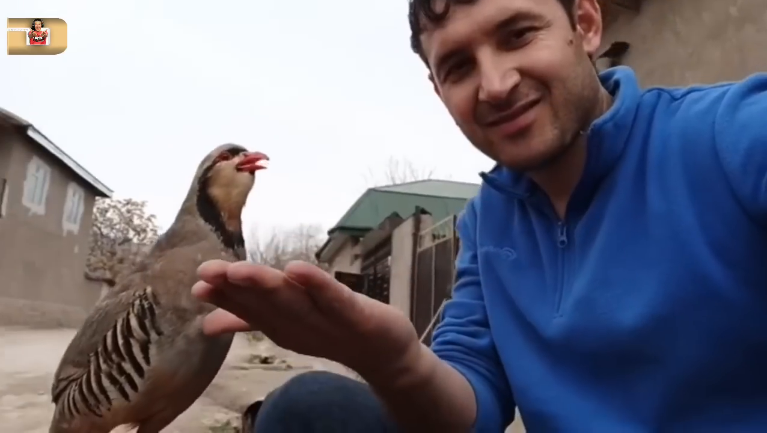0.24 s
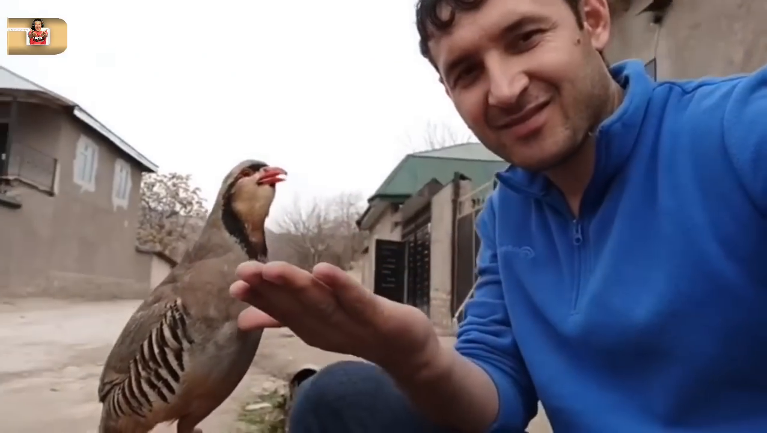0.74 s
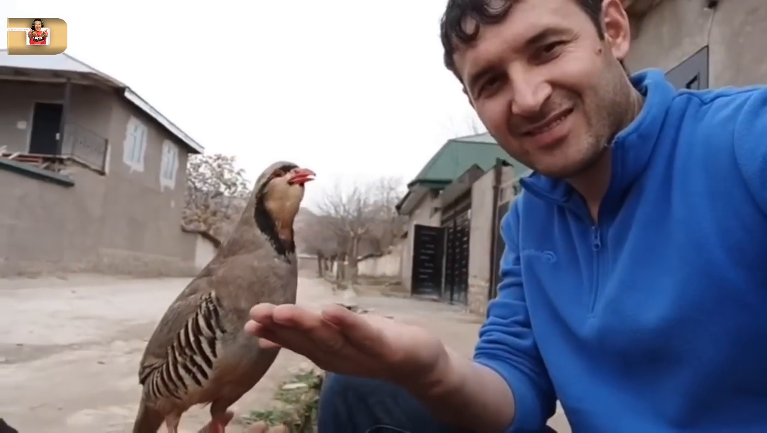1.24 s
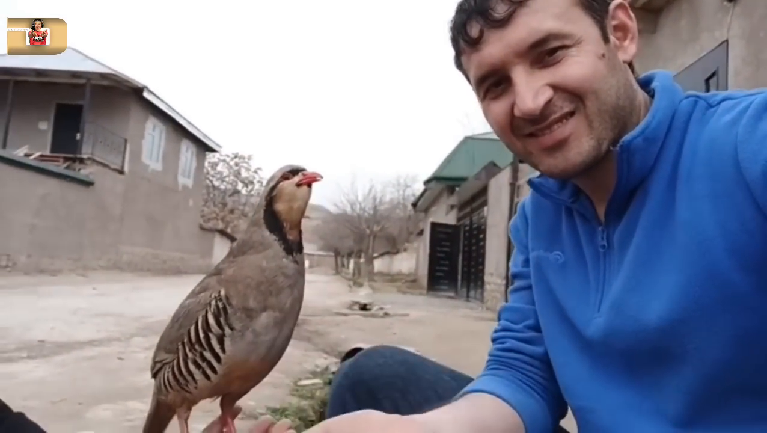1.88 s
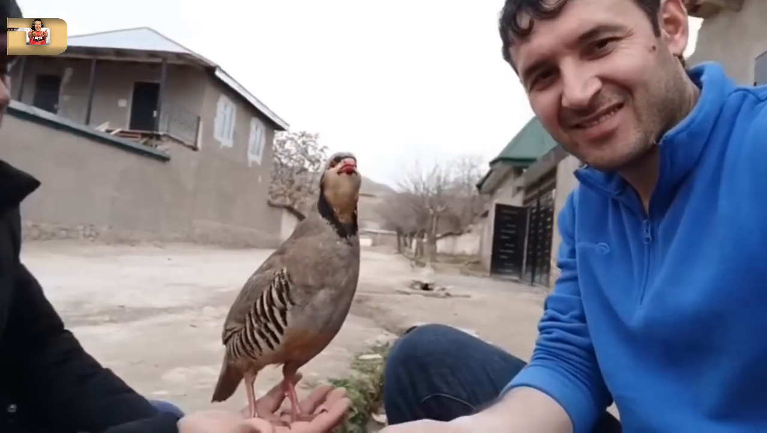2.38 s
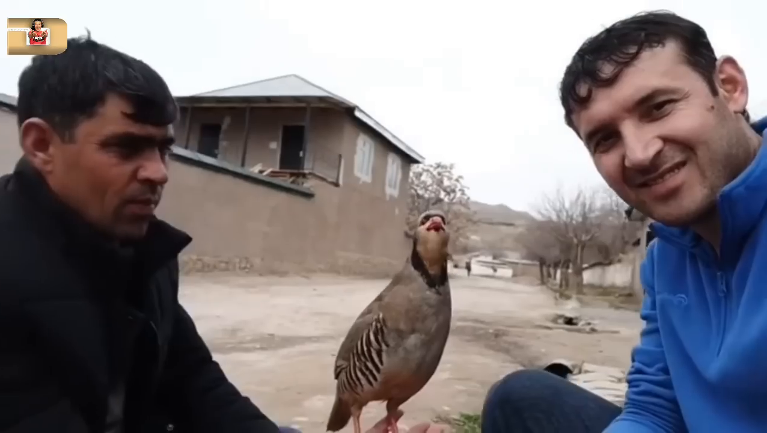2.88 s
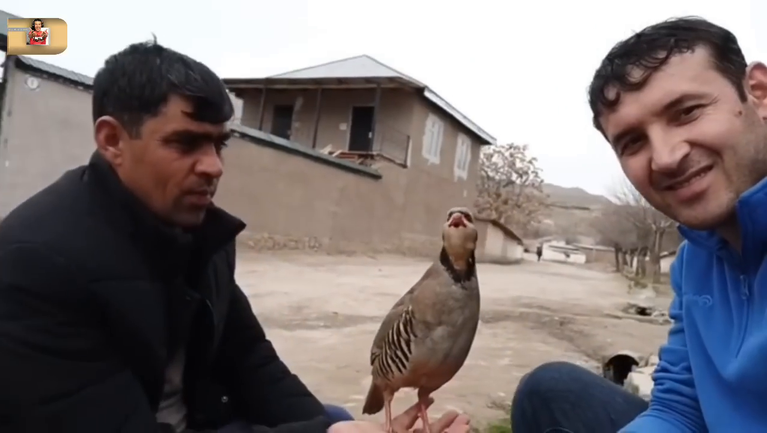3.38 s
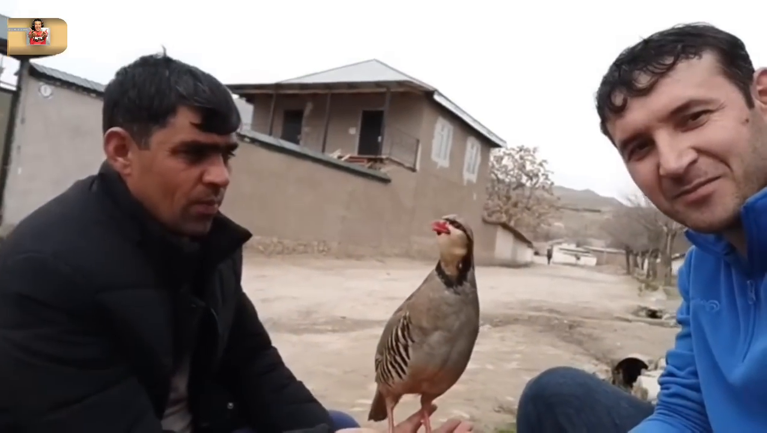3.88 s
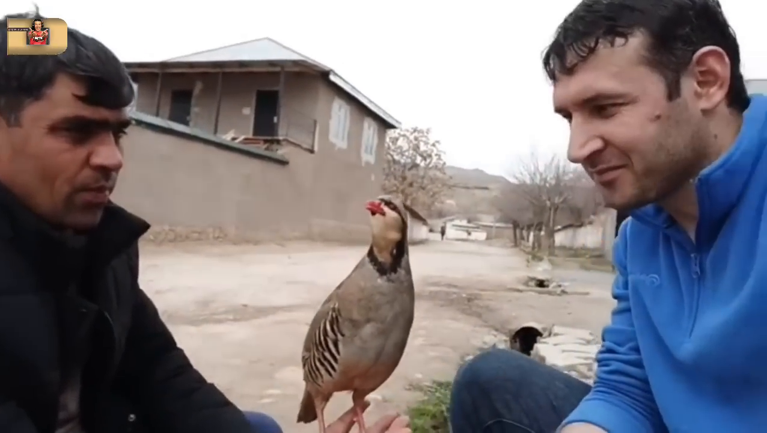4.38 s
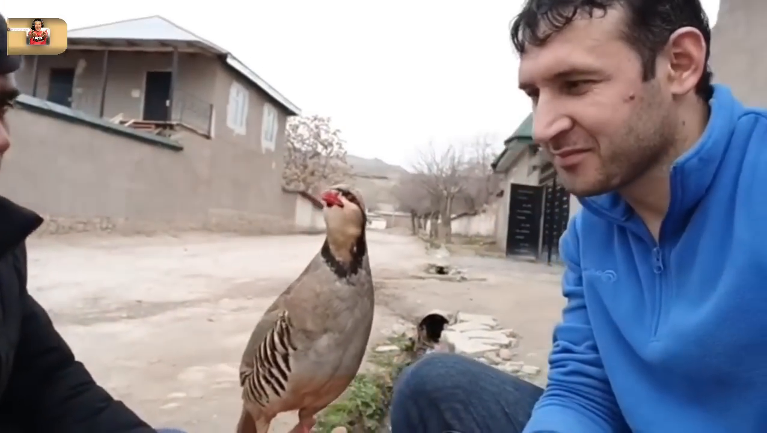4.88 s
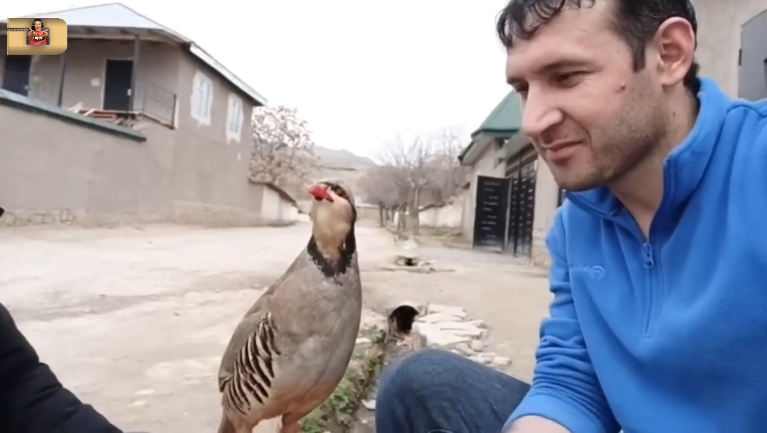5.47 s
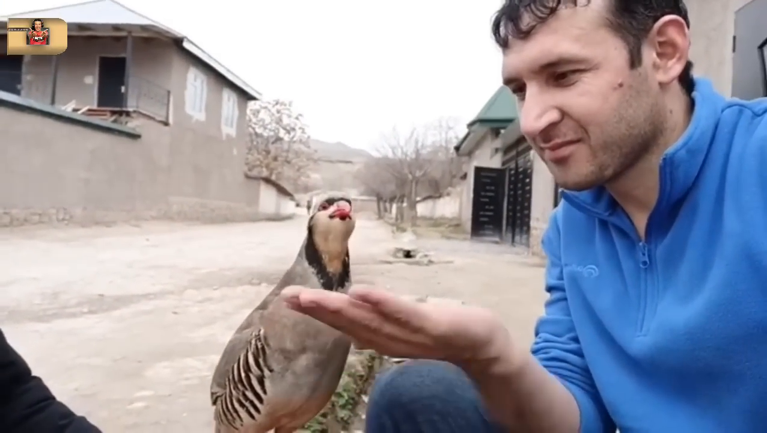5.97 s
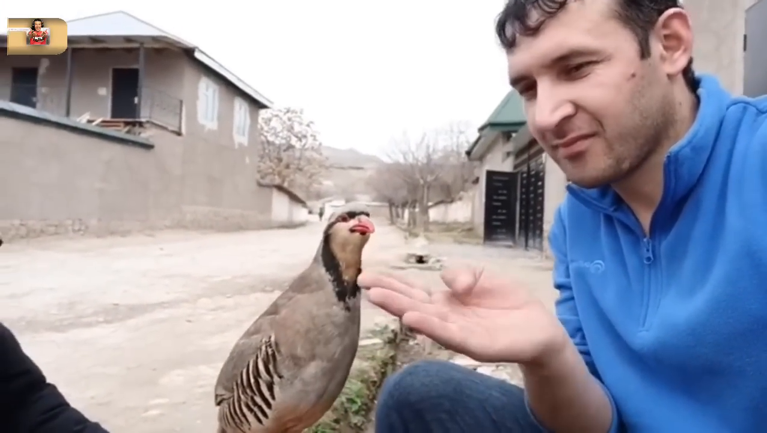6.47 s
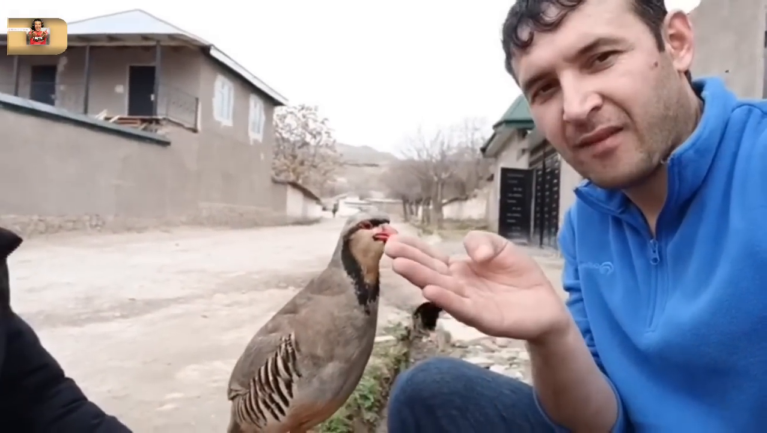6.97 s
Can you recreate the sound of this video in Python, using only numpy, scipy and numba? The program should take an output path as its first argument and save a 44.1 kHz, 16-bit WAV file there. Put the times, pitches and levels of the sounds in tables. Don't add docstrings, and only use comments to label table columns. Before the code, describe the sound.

Outdoors in a village lane, a partridge a metre from a phone calls loudly. After a tiny knock at the start, strong throaty clucks fall evenly from 0.1 to 0.75 seconds, about six per second, with double notes near 0.9 and 1.1. From 1.25 to 3 seconds the run becomes rougher and uneven: weak trailing clucks, creaks with a quiet swell before a burst, and squeaks around 2.6 and 3. Between 3.3 and 4.5, longer two-part notes alternate with firm clucks; from 4.65 harsh squeaks and creaks dominate until a last squeak around 5.75. Then the bird stops abruptly. Wind swells softly near 0.7, 2.75 and 4.7 with low thumps, and house walls echo faintly. From 5.8 to just over 7 seconds only low murmur remains, with a very faint far dove, tiny bird pipes, and a dull scuff, tick and knock around 6.8 to 7.1.

```python
import sys
import numpy as np
from scipy import signal
from scipy.fft import rfft, irfft, next_fast_len
from scipy.io import wavfile
from scipy.ndimage import uniform_filter1d, map_coordinates
from numba import njit

SR = 44100
rng = np.random.default_rng(int(sys.argv[2]) if len(sys.argv) > 2 else 0)


def store_pcm(level_fs):
    pcm = np.round(np.clip(level_fs, -1, 1) * 32767).astype(np.int16)
    wavfile.write(sys.argv[1], SR, np.atleast_2d(pcm).T)


def nominal_scale(level):
    x = np.asarray(level, float) / 20
    return 10 ** x


N = 319284
t = np.arange(N) / SR

# freq_hz, level_db (per Hz)
MURMUR = [(90, -42), (150, -14), (350, 1), (900, -12.5), (2000, -20.5), (2800, -24.5), (4700, -19.5),
          (5300, -53), (6600, -23), (8500, -29), (12500, -36)]
# peak_s, level_db, rise_s, fall_s
GUSTS = [
    (.68, -34.5, 0.13, .55),
    (1.6, -48.5, 0.24, .1),
    (2.299, -47, 0.11, 0.16),
    (2.75, -40.5, .3, .25),
    (4.25, -47.5, 0.24, 0.18),
    (4.698, -40, 0.24, 0.24),
    (5.901, -64, 0.4, .5),
]
# start_s, level_db, pitch_hz
THUMPS = [
    (0.658, -31, 89),
    (1.237, -36.5, 76.2),
    (1.597, -28, 136.5),
    (2.81, -29.5, 120.5),
    (4.198, -37, 80.4),
    (4.245, -27.5, 122.2),
    (4.599, -31.5, 164),
    (5.462, -33.5, 95.5),
    (6.137, -38, 90),
    (7.189, -50.5, 117.8),
]
# start_s, level_db, pitch_hz, width_hz, decay_s
KNOCKS = [
    (0, -38, 1160, 1200, 0.008),
    (6.821, -59.5, 650, 905, 0.05),
    (6.904, -50, 8170, 2520, 0.005),
    (7.07, -55.5, 850, 1164, 0.031),
]
# full_voice_s, length_s, level_db, onset_hz, pitch_hz
CLUCKS = [(0.113, 0.047, -7, 453.5, 453.4), (.271, 0.047, -7, 460, 444), (.425, 0.048, -7, 465.5, 439.6),
          (0.581, 0.047, -8, 499, 442.4), (0.745, .044, -7.5, 535.1, 446.5),
          (1.365, .033, -10.5, 521.4, 418.9), (1.926, 0.033, -18, 547.4, 365.3),
          (2.406, .032, -11, 581.4, 429.6), (3.752, 0.037, -9.5, 595.4, 453.8),
          (4.138, .046, -10, 579.6, 470.7), (4.511, .052, -10, 600.5, 450.2)]
# full_voice_s, length_s, level_db, onset_hz, pitch_hz
TRAILS = [
    (1.259, .064, -9.5, 538, 415.6),
    (1.56, 0.039, -14, 490.2, 392.7),
    (2.305, .065, -10.5, 570.7, 408.4),
    (5.351, 0.051, -14, 511.8, 386),
]
# full_voice_s, length_s, level_db, pitch_hz, roughness (0-1)
SQUEAKS = [
    (2.614, .04, -12.5, 590.3, 0.43),
    (2.977, 0.034, -17.5, 651.6, 0.19),
    (4.656, .04, -10, 593.4, .45),
    (4.985, .046, -13.5, 559.6, .35),
    (5.732, 0.036, -15, 668.6, .45),
]
# full_voice_s, length_s, level_db, first_hz, held_hz
DOUBLES = [
    (.897, 0.073, -7.5, 439.3, 405.2),
    (1.096, .063, -8, 423.7, 417.2),
    (3.344, .068, -10, 579.6, 402.9),
    (3.519, 0.081, -12.5, 579.6, 380.5),
    (3.903, .094, -11.5, 621.7, 383.6),
    (4.28, 0.099, -9, 621.2, 424.9),
]
# start_s, swell_s, swell_db, burst_db, swell_hz
CREAKS = [
    (1.667, .053, -28, -11.5, 679),
    (2.037, 0.062, -27, -12, 494.9),
    (2.734, 0.038, -27.5, -15, 464.6),
    (3.087, 0.043, -25.5, -11.5, 460),
    (4.768, 0.017, -16, -10, 676.1),
    (5.102, .052, -22, -11, 694.2),
    (5.484, 0.043, -23.5, -10.5, 682.2),
]
# freq_hz, level_db
CHEST = [(200, -19.5), (400, -23), (650, -18), (950, -18.5), (1300, -14.5), (1700, -27), (2500, -35.5),
         (2900, -41.5), (3300, -66)]
# freq_hz, level_db
BEAK = [(3000, -45), (3450, -14), (4100, -10), (4700, -1), (5250, -12), (5750, -36), (6400, -18),
        (7300, -13), (8500, -27), (12300, -21)]
# time_s, pan_db (left minus right), left_lead_samples
PLACE = [(0, -1, 7), (1.2, -4, 6), (2.2, -5, 4), (2.7, -5, 0), (3.7, -2.6, 0), (4.7, -4, 3), (5.8, -5.6, 4)]
# time_s, treble_db, under_4k_db, over_6k_db
FACING = [(0, -1, -12, 6.5), (.8, -2.5, -9, 1.5), (1.2, 1.5, -2.5, 4), (1.601, 3, -0.5, -3.5),
          (2.3, 5, 3, -1), (3, 0.5, 4, -2), (3.7, 0.5, 3, 3.5), (4.3, -2.5, -3.5, 2.5), (4.7, 0, 3, 3.5),
          (5.05, 3.5, -1.5, -9.5), (5.25, -1.5, -2, -5), (5.8, 4, 9, 1)]
# start_s, length_s, level_db, from_hz, to_hz
COOS = [
    (3.17, .16, -67.5, 290.4, 287.1),
    (5.8, 0.12, -73, 334.4, 317),
    (6.0, 0.085, -70, 352, 352),
    (6.09, 0.098, -66, 310, 303),
    (6.364, 0.278, -71, 407.4, 403),
    (6.7, 0.24, -76, 347.6, 349.5),
]
# start_s, length_s, level_db, from_hz, to_hz
PIPES = [
    (.3, 0.12, -76, 455, 460),
    (1.43, 0.09, -78, 1690, 1660),
    (6.14, 0.08, -70, 1013, 952),
    (6.55, .075, -80.5, 2055, 1690),
    (6.605, 0.092, -82.5, 1720, 1660),
    (6.95, 0.091, -87, 4300, 3380),
    (7.06, .11, -81, 1586, 1585),
]
# freq_hz, level_db
MIC = [(30, -24), (70, 3), (8300, 2), (9200, -29.5), (11100, -47), (11500, 4), (13000, 2.5), (13600, -29.5),
       (14300, -56.5)]

SILENT_DB = 42
THROAT_SHUT, THROAT_SLACK = 0.79, 0.89
SAG = .8
CLUCK_RASP_DB, SQUEAK_RASP_DB, DOUBLE_RASP_DB, CREAK_RASP_DB = -26.5, -28.5, -25.5, -22.5


def unit(x):
    return x / np.sqrt(np.mean(x ** 2))


def colour(x, table):
    hz, db = np.transpose(table)
    size = next_fast_len(N)
    bins_hz = np.arange(size // 2 + 1) * SR / size
    gain = nominal_scale(np.interp(np.log(bins_hz + 1), np.log(hz), db))
    return irfft(rfft(x, size) * gain, size)[..., :N]


def walk(rate):
    k = int(SR / rate)
    steps = np.repeat(rng.standard_normal(N // 20), k)[:N]
    return 1.5 * uniform_filter1d(uniform_filter1d(steps, k), k)


@njit
def resonate(x, hz, width):
    y, b, l = np.empty(len(x)), 0., 0.
    for i in range(len(x)):
        g, k = np.tan(np.pi * hz[i] / SR), width / hz[i]
        v = (b + g * (x[i] - l)) / (1 + g * (g + k))
        b, l, y[i] = 2 * v - b, l + 2 * g * v, k * v
    return y


def village():
    mid = colour(rng.standard_normal(N), MURMUR)
    side = colour(rng.standard_normal(N), MURMUR)
    pair = mid + colour(side, [(300, -10.5), (1200, 0.5)]) * np.array([[1], [-1]])
    murmur = 0
    for hz in 200. * 2 ** np.arange(7):
        octave = colour(pair, [(hz / 2, -25), (hz, 0), (hz * 2, -25)])
        murmur = murmur + nominal_scale(2.2 * walk(16)) * octave
    return nominal_scale(-58.5) * unit(murmur)


def wind():
    gust = nominal_scale(-61)
    for s, db, rise, fall in GUSTS:
        gust = gust + nominal_scale(db) * np.exp(-((t - s) / np.where(t < s, rise, fall)) ** 2)
    rumble = [(30, -23.5), (60, -5), (100, 5), (180, -4.0), (300, -9), (600, -57)]
    eddies = []
    for _ in range(2):
        buffet = nominal_scale(6.5 * np.minimum(walk(60), 2))
        eddies.append(unit(colour(rng.standard_normal(N) * buffet, rumble)))
    thumps = 0
    for s, db, hz in THUMPS:
        swell = np.exp(-((t - s) * hz / 0.7 - 1.6) ** 2)
        thumps = thumps + nominal_scale(db) * swell * np.sin(2 * np.pi * hz * (t - s))
    return gust * nominal_scale(np.array([[4.], [-4.]])) * np.array(eddies) + nominal_scale(np.array([[4.], [-6.]])) * thumps


def knocks():
    out = 0
    for s, db, hz, width, decay in KNOCKS:
        centre_hz = np.full(N, 1. * hz)
        ring = resonate(rng.standard_normal(N), centre_hz, 1. * width)
        ring = unit(resonate(ring, centre_hz, 1. * width))
        out = out + nominal_scale(db) * ring * (t > s) * np.exp(-np.abs(t - s) / decay)
    return out


def settle(onset_hz, hz):
    return .006 + .018 * abs(np.log2(onset_hz / hz))


def opening(s, db, onset_hz, hz, throat_hz, attack):
    return [(s - attack - .007, db - SILENT_DB, onset_hz, THROAT_SHUT * throat_hz),
            (s - attack, db - 14.5, onset_hz, THROAT_SLACK * throat_hz),
            (s, db, hz, throat_hz)]


def closing(end, db, hz, throat_hz):
    return [(end - .014, db - 11.5, hz, THROAT_SLACK * throat_hz),
            (end, db - SILENT_DB, hz, THROAT_SHUT * throat_hz)]


def cluck(s, length, db, onset_hz, hz):
    rough = np.clip(.05 + .05 * (-6.5 - db), .05, .6)
    throat_hz = 3 * hz
    slide = (onset_hz / hz) ** .3
    held_hz = hz / slide
    start = opening(s, db, onset_hz, .93 * hz * slide, throat_hz, settle(onset_hz, hz))
    hold = [(s + .36 * length, db - 8 * rough, held_hz, throat_hz)]
    return start + hold + closing(s + length, db, SAG * held_hz, throat_hz), rough, CLUCK_RASP_DB


def double(s, length, db, first_hz, hz):
    throat_hz, held_db = 3 * hz, db - 1.5
    break_s, regain_s, push_s = .016, .028, length - .026
    dip_db = 2.5 + 7.5 * np.log2(first_hz / hz)
    held = [(s + break_s, held_db - dip_db, first_hz, throat_hz),
            (s + regain_s, held_db - 1.5, hz, throat_hz),
            (s + (regain_s + push_s) / 2, held_db - 4.5, hz, throat_hz),
            (s + push_s, held_db, hz, throat_hz)]
    start = opening(s, db, 1.08 * first_hz, first_hz, 1.04 * throat_hz, .014)
    rough = .25 * first_hz / hz - .1
    return start + held + closing(s + length, held_db, SAG * hz, throat_hz), rough, DOUBLE_RASP_DB


def trail(s, length, db, onset_hz, hz):
    throat_hz = 3 * hz
    limp_hz = .72 * throat_hz
    tail = [(s + .014, db - 6, .94 * hz, THROAT_SLACK * throat_hz),
            (s + 0.51 * length, db - 14, hz, THROAT_SHUT * throat_hz),
            (s + length - .008, db - 20, 1.1 * hz, limp_hz),
            (s + length, db - SILENT_DB, hz, limp_hz)]
    return opening(s, db, onset_hz, hz, throat_hz, settle(onset_hz, hz)) + tail, .55, CLUCK_RASP_DB


def creak(s, swell, swell_db, db, hz):
    shut_hz, open_hz = np.array((744, 939)) * (1 + .25 * np.exp(-(swell / .03) ** 2))
    burst, burst_hz, beat_s = s + swell, 460, .011
    low_hz, wide_hz = .88 * burst_hz, 1.22 * open_hz
    rows = [(s - .012, swell_db - 20.5, hz, shut_hz),
            (s, swell_db - 2, hz, shut_hz),
            (burst - .004, swell_db + 2, 692, open_hz),
            (burst, db - 1.5, burst_hz, 1.07 * open_hz),
            (burst + beat_s, db - 6, burst_hz, 1.14 * open_hz),
            (burst + 2 * beat_s, db, low_hz, wide_hz)]
    return rows + closing(burst + 2 * beat_s + .024, db - 5, SAG * low_hz, wide_hz), .8, CREAK_RASP_DB


def squeak(s, length, db, hz, rough):
    throat_hz = 1.85 * hz
    hold = [(s + .36 * length, db - 2.5, hz, throat_hz)]
    rows = opening(s, db, hz, hz, throat_hz, 0.0053) + hold + closing(s + length, db, hz, throat_hz)
    return rows, np.clip(rough, 0, 1), SQUEAK_RASP_DB


def song():
    kinds = [(cluck, CLUCKS), (trail, TRAILS), (squeak, SQUEAKS), (double, DOUBLES), (creak, CREAKS)]
    notes = [kind(*row) for kind, rows in kinds for row in rows]
    return zip(*sorted(notes, key=lambda note: note[0][0][0]))


@njit
def flap(hz, rough, chance, jitter, scatter):
    pulses, phase, p, k = np.zeros(len(hz) + 1), np.empty(len(hz)), 0., 0
    for i in range(len(hz)):
        step = hz[i] * np.exp(jitter * rough[i] * chance[k, 0]) / SR
        p += step
        if p >= 1:
            p, k = p - 1, k + 1
            size = np.exp(scatter * rough[i] * chance[k, 1]) / np.sqrt(hz[i])
            pulses[i] += size * p / step
            pulses[i + 1] += size * (1 - p / step)
        phase[i] = p
    return pulses[:-1], phase


def windpipe(source, throat_hz, stutter):
    ring = resonate(source, throat_hz + 30, 160.0)
    body = stutter * colour(source + nominal_scale(21.0) * ring, CHEST)
    return body / np.sqrt(uniform_filter1d(body ** 2, int(.014 * SR)))


def beak(pulses, breath, rough, wide_hz):
    smear = signal.chirp(t[:105], 1500, t[105], 15000)
    hiss = unit(np.convolve(pulses, smear, "same")) + nominal_scale(-3) * (.15 + rough) * breath
    rasp = colour(hiss + nominal_scale(2.5) * resonate(hiss, 3.7 * wide_hz, 400.), BEAK)
    return rasp / np.sqrt(uniform_filter1d(rasp ** 2, int(.03 * SR)))


def partridge():
    notes, note_rough, rasp_db = song()
    s, db, row_hz, throat_hz = np.concatenate(notes).T
    effort = np.interp(t, s, nominal_scale(.7 * db)) ** (1 / .7)
    pitch_hz, throat_hz = np.interp(t, s, row_hz), np.interp(t, s, throat_hz)
    row = np.clip(np.searchsorted(s, t), 1, len(s) - 1)
    jump = np.abs(np.log(row_hz[row] / row_hz[row - 1])) > .24
    nearest = np.rint(np.interp(t, s, np.arange(len(s)))).astype(int)
    pitch_hz = np.where(jump, row_hz[nearest], pitch_hz)

    which = np.searchsorted([note[-1][0] for note in notes[:-1]], t)
    sounding = sum((t > note[0][0]) & (t < note[-1][0]) for note in notes)
    peak = np.array([nominal_scale(max(row[1] for row in note)) for note in notes])[which]
    wide_hz = np.array([max(row[3] for row in note) for note in notes])[which]
    age = t - np.array([note[0][0] for note in notes])[which]
    effort = np.maximum(effort - .035 * peak, 0)
    push = effort / peak

    harsh = np.array(note_rough)[which] * (1.1 - .3 * push)
    flutter = .45 * np.exp(-(age / .016) ** 2) + .3 * jump + .4 * (1 - push) ** 2
    rough = np.clip(harsh + flutter, 0, 1)
    slip = np.exp(.2 * harsh * walk(110))
    stutter = nominal_scale(7.5 * harsh * (1 - .7 * push) * np.clip(walk(110), -2, 1.3))

    pulses, phase = flap(pitch_hz * slip, rough, rng.standard_normal((N // 30, 2)), .09, .25)
    pulses = unit(pulses)
    breath = unit(np.exp(-phase / 0.32) * rng.standard_normal(N))
    body = windpipe(pulses + nominal_scale(-5.5) * rough * breath, throat_hz, stutter)
    rasp = beak(pulses, breath, rough, wide_hz)
    rasp_level = nominal_scale(np.array(rasp_db)[which]) * stutter * peak * push ** .95
    return effort * sounding * body, rasp_level * sounding * rasp


def at_ports(body, rasp):
    s, pan_db, lead = np.transpose(PLACE)
    pan_db, lead = np.interp(t, s, pan_db), np.interp(t, s, lead)
    s, *facing_db = np.transpose(FACING)
    treble_db, under_db, top_db = (np.interp(t, s, db) for db in facing_db)
    top = colour(rasp, [(5600, -40), (6100, 0)])
    under = colour(rasp, [(3900, 0), (4400, -40)])
    bands = [(under_db, under), (0.5, rasp - under - top), (top_db, top)]
    rasp = nominal_scale(treble_db) * sum(nominal_scale(db + 2.5 * walk(140)) * part for db, part in bands)
    low = colour(body, [(800, 0), (1150, -20)])
    high = body - low
    left = low + nominal_scale(1.3 * pan_db) * high
    left = left + nominal_scale(1.3 * pan_db + 1.5 + 0.87 * walk(69)) * rasp
    right = nominal_scale(-2.0) * low + nominal_scale(-.4 * pan_db) * high
    right = right + nominal_scale(-.6 * pan_db + 1.0 + 2.0 * walk(60)) * rasp
    heard_at = np.arange(N) + lead + 1.4 * walk(30)
    return np.array([map_coordinates(left, [heard_at], order=3), right])


def walls(x):
    t60_s, delay_s, level_db = 0.58, .025, -40.5
    lag = t[:SR]
    tail = rng.standard_normal((2, SR)) * nominal_scale(-60 * lag / t60_s) * (lag > delay_s)
    return nominal_scale(level_db) * signal.fftconvolve(x[None], tail / np.sqrt(0.0057 * SR), axes=1)[:, :N]


def far_birds():
    out = 0
    for s, length, db, from_hz, to_hz in COOS + PIPES:
        fade = np.clip(np.minimum(t - s, s + length - t) / 0.02, 0, 1)
        hz = np.interp(t, [s, s + length], [from_hz, to_hz])
        out = out + fade * nominal_scale(db + 13.5) * np.sin(2 * np.pi * np.cumsum(hz) / SR)
    return out * nominal_scale(np.array([2.5 * walk(14), 2.5 * walk(14)]))


def scene():
    body, rasp = partridge()
    bird = at_ports(body, rasp) + walls(body + nominal_scale(-1.5) * rasp)
    return village() + wind() + knocks() + bird + far_birds()


def low_pass(x):
    return signal.sosfilt(signal.butter(12, 14230, fs=SR, output="sos"), x)


def record(dry):
    rounded = dry / (1 + np.abs(1.4 * dry) ** 4) ** .25
    return low_pass(colour(rounded, MIC))


dry = scene()
out = record(dry)
store_pcm(out)
```